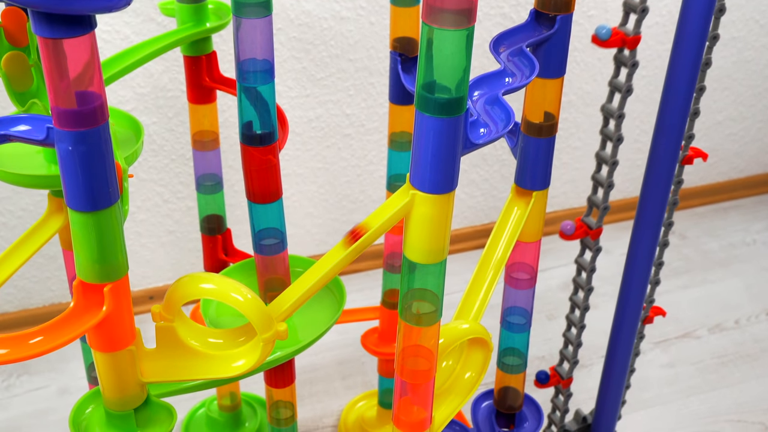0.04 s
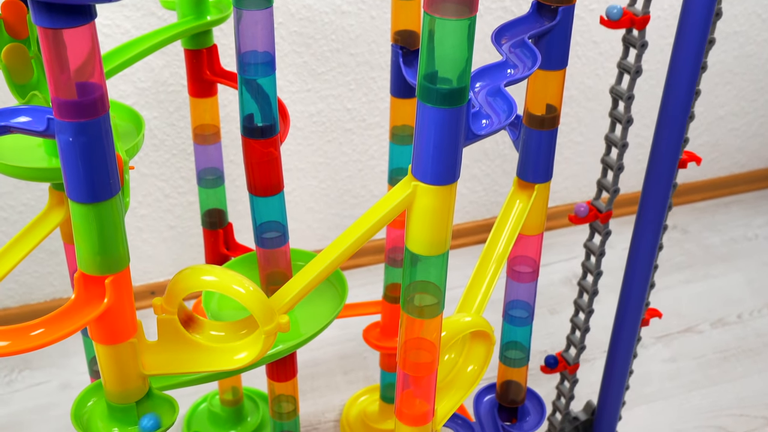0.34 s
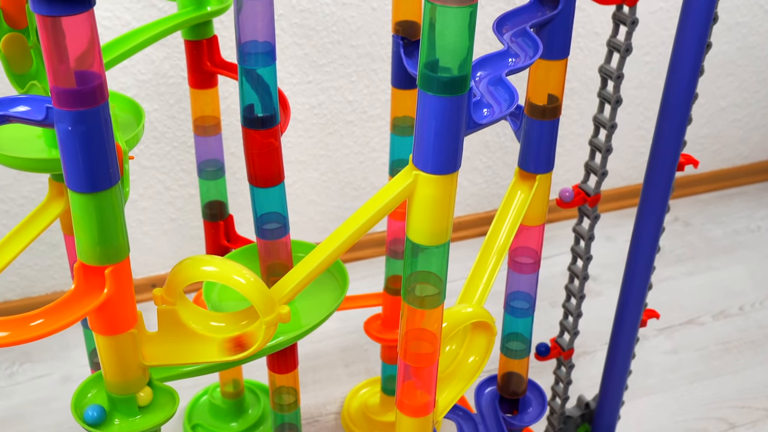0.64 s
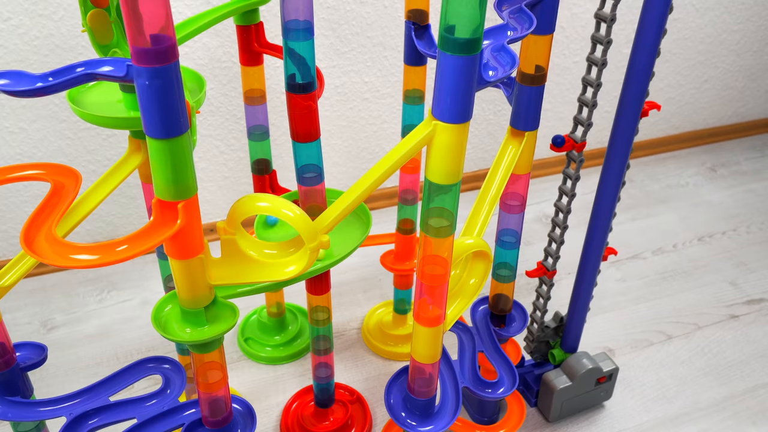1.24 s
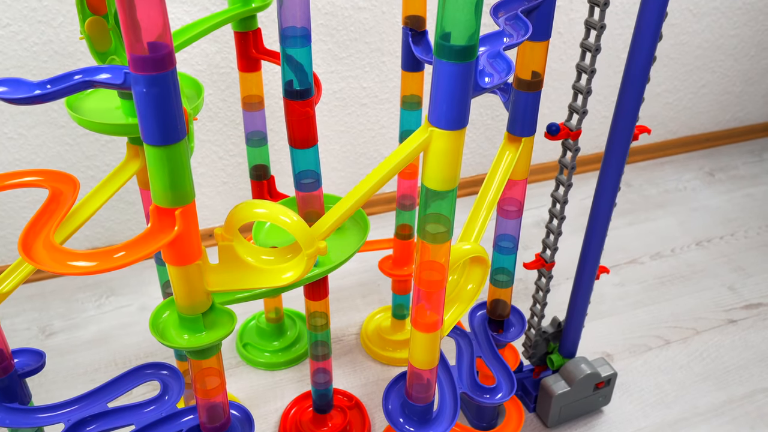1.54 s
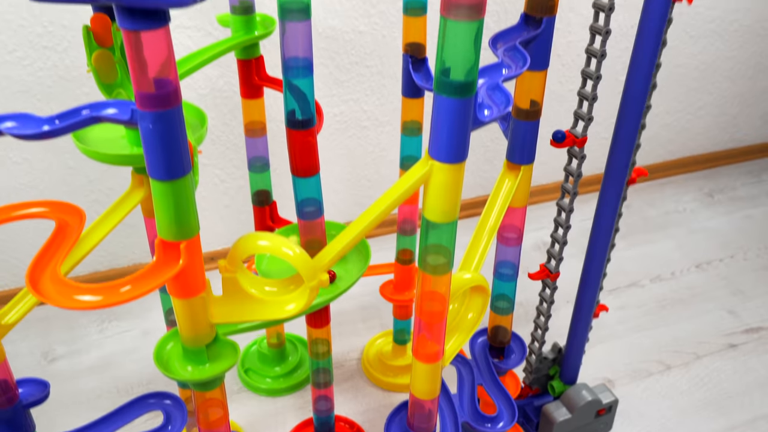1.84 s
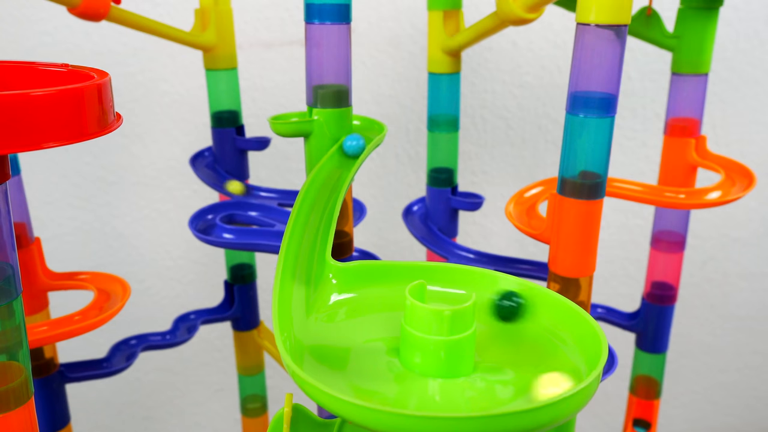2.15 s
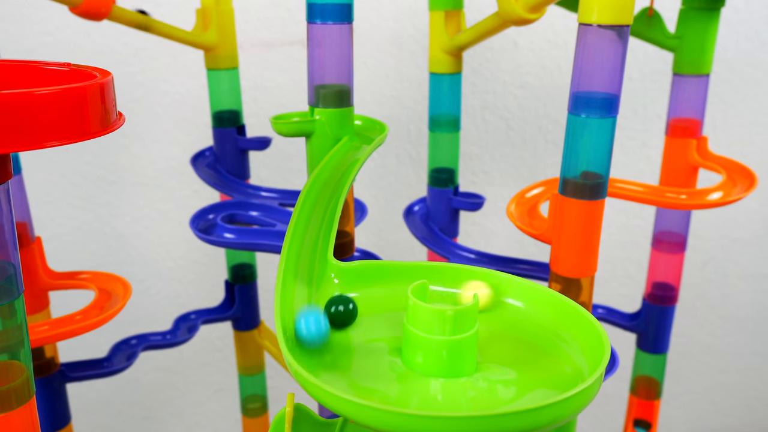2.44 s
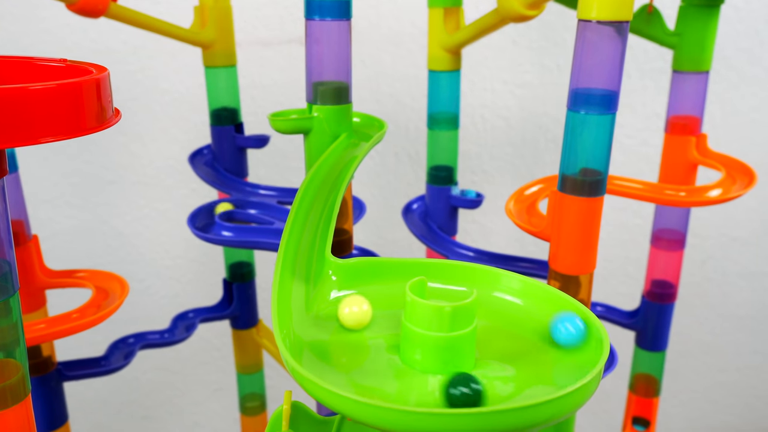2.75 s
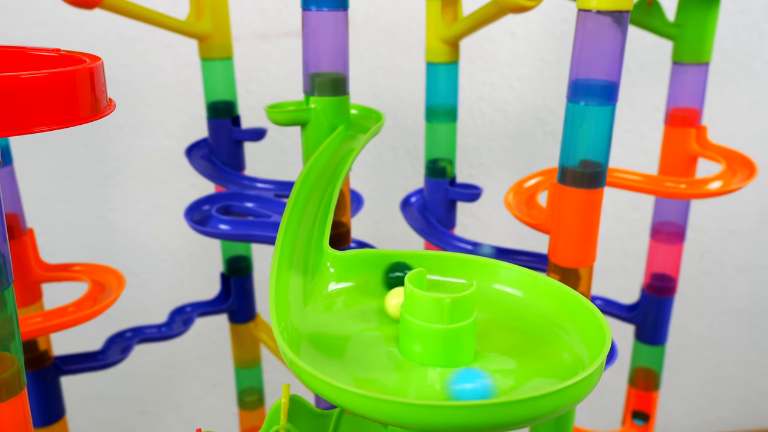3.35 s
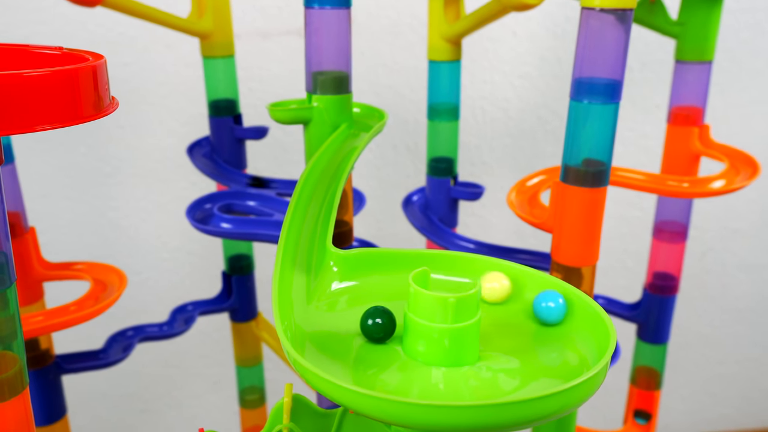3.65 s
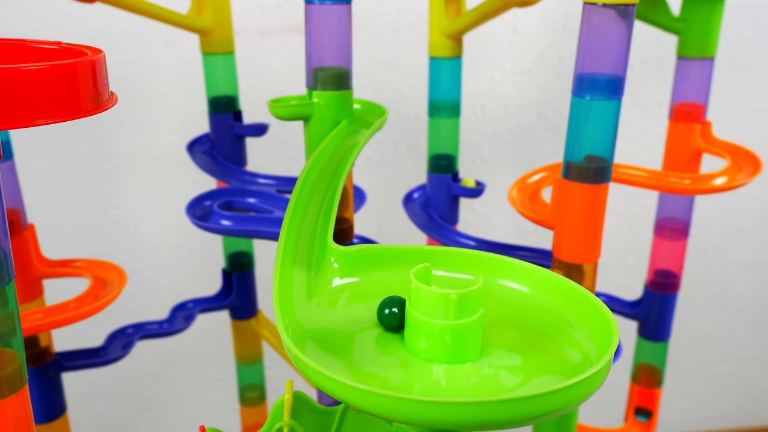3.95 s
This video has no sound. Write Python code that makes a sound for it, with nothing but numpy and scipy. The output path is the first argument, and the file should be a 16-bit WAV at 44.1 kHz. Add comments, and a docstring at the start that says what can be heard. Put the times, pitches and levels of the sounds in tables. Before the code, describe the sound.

Marbles roll and click through a plastic marble run: first a bright circling rattle, then quick ringing drops and a brief whirr, then clicks against a bowl and each other. A lift motor hums faintly, all close in a small room.

```python
"""Glass marbles run through a plastic marble run, close up in a small room.
From the start a lift motor hums faintly over rumble and hiss, while marbles circle a funnel with a
bright rattle and roll along tracks, tapping over tiny bumps. From 1.3 s the funnel falls back and
marbles drop in quick succession onto hollow pieces that ring; one whirrs round a loop, loudest near
2 s. After 2.2 s the drops, and the clicks on rims and other marbles, take on the tone of a wide bowl."""
import sys
import numpy as np
from scipy import signal
from scipy.fft import rfft, irfft
from scipy.io import wavfile

SR = 44100
rng = np.random.default_rng(int(sys.argv[2]) if len(sys.argv) > 2 else 0)


def output_pcm(signal):
    """Save a mono or channel-first signal as 16-bit PCM at the path in sys.argv[1].

    Samples are clipped to [-1, 1] before scaling.
    """
    pcm = np.clip(np.atleast_2d(signal).T, -1, 1) * 32767
    wavfile.write(sys.argv[1], SR, np.round(pcm).astype(np.int16))


N = 176400


def amp(db):
    """Decibels to gain."""
    return 10 ** (np.asarray(db) / 20)


def unit(x):
    """Scales to rms 1."""
    return x / np.sqrt(np.mean(x ** 2) + 1e-20)


def fader(points):
    """Gain over time from (t/s, level/dB) points, held beyond the first and last."""
    return amp(np.interp(np.arange(N) / SR, *np.transpose(points)))


def eq(x, points):
    """Filters by (f/Hz, level/dB) points."""
    hz, db = np.transpose(points)
    f = np.fft.rfftfreq(len(x), 1 / SR)
    return irfft(rfft(x) * amp(np.interp(np.log(f + 1), np.log(hz), db)), len(x))


def wander(rate_hz):
    """Slow random motion of rms 1."""
    f = np.fft.rfftfreq(N, 1 / SR)
    return unit(irfft(rfft(rng.standard_normal(N)) / (1 + (f / rate_hz) ** 4), N))


def add(mix, s, sound):
    """Mixes a sound in at time s."""
    part = mix[max(round(s * SR), 0):][:len(sound)]
    part += sound[:len(part)]


def resonance(f, hz, width):
    """Response of one damped mode, gain 1 at its centre."""
    return 1j * f * width / (hz ** 2 - f ** 2 + 1j * f * width)


def plastic(modes, size, low_cut_hz=359):
    """Response of a thin plastic piece: modes on a plain shell that radiates no bass."""
    f = np.fft.rfftfreq(size, 1 / SR)
    no_bass = signal.freqz(*signal.butter(4, low_cut_hz, "high", fs=SR), worN=f, fs=SR)[1]
    return no_bass * (1 + sum(amp(db) * resonance(f, hz, width) for hz, width, db in modes))


# Tone of the hiss and of the rumble: f/Hz, level/dB
HISS_EQ = [(80, -7), (120, 4.5), (220, -4), (340, -1), (800, 6.5), (2200, -1), (6000, -34), (7500, 1.5),
           (12500, -21), (16000, -55)]
RUMBLE_EQ = [(5, -4), (14, 6), (26, -15.5), (38, -1.5), (47, -2), (60, -20), (74, -18.5), (90, -27.5),
             (200, -60), (600, -90)]
# Fader ride on the rumble: t/s, level/dB
RUMBLE_SWELL = [(0, -3.5), (.8, -4.5), (1.4, -1.5), (2.15, 3.5), (2.32, 6.5), (2.45, 0.5), (3.2, -0.5),
                (4, -0.5)]

def room_tone(hiss_db=-50, rumble_db=-37):
    """The bed: soft hiss and a low swelling rumble."""
    hiss = unit(eq(rng.standard_normal(N), HISS_EQ))
    rumble = unit(eq(rng.standard_normal(N), RUMBLE_EQ))
    return amp(hiss_db) * hiss + amp(rumble_db) * fader(RUMBLE_SWELL) * rumble


# Partials of the motor hum: f/Hz, level/dB
MOTOR_TONES = [(339, -65.5), (1084, -71), (1438, -59), (1768, -77)]

def lift_motor(pitch_waver=0.0023, flutter_db=5.5):
    """The motor and its gears hum faint tones that waver together in pitch."""
    wavering_time = np.cumsum(1 + pitch_waver * wander(13.0)) / SR
    return sum(amp(db) * unit(np.sin(2 * np.pi * hz * wavering_time) * amp(flutter_db * wander(9.6)))
               for hz, db in MOTOR_TONES)


# Pitch and fader ride of the whirr: t/s, f/Hz, level/dB
WHIRR_PATH = [(1.35, 2110, -47), (1.721, 2017, -54), (1.96, 2093, -32.5), (2.22, 2207, -56),
              (2.4, 2097, -46), (2.55, 1960, -61)]

def loop_whirr(width_hz=160):
    """A marble running round the loop sings in one narrow, shifting resonance."""
    s, hz, db = np.transpose(WHIRR_PATH)
    carrier = np.exp(2j * np.pi * np.cumsum(np.interp(np.arange(N) / SR, s, hz)) / SR)
    narrow_noise = wander(width_hz) + 1j * wander(width_hz)
    return fader(np.transpose([s, db])) * unit((carrier * narrow_noise).real)


def rolling(ride, tone, modes, bumps_per_s=2500, spread_db=1, flutter_db=3):
    """A rolling marble taps over countless tiny bumps, which ring the piece under it."""
    sizes = amp(spread_db * np.minimum(rng.exponential(1, N), 3.5)) * rng.choice([-1, 1], N)
    bumps = sizes * (rng.random(N) < bumps_per_s / SR) * amp(flutter_db * wander(17.7))
    ringing = irfft(rfft(bumps) * plastic(modes, N), N)
    return fader(ride) * unit(eq(ringing, tone))


# Body resonances of the tracks: f/Hz, width/Hz, level/dB over the plain shell
TRACK_MODES = [(278, 21, 4.5), (335, 8.2, 7.5), (418.7, 16, 5), (480, 15, 5), (589, 18, -4), (692, 6.8, 3),
               (1098, 28, 3), (1463, 19, 6.5), (1796, 64, 5.5), (2855, 150, -1.5), (4600, 1700, -3),
               (8960, 2100, -4)]
# Fader ride on the track roll: t/s, level/dB
TRACK_RIDE = [(0, -37.5), (.7, -45), (.9, -40.5), (1.3, -44.5), (1.5, -37.5), (1.72, -47), (1.84, -46),
              (1.96, -33.5), (2.1, -46), (2.22, -60), (2.37, -46.5), (2.62, -48), (2.8, -49.5),
              (3.16, -40.5), (3.36, -57), (3.6, -37), (3.76, -49.5), (4, -38.5)]
# Tone of the track roll: f/Hz, level/dB
TRACK_EQ = [(300, -7), (500, -5.5), (1000, -0.5), (1900, -7), (3000, -1), (5000, -9.5), (8000, -17),
            (16000, -25)]

def track_roll():
    """Marbles run along the tracks with a dark, grainy roll."""
    return rolling(TRACK_RIDE, TRACK_EQ, TRACK_MODES)


# Body resonances of the funnel: f/Hz, width/Hz, level/dB over the plain shell
FUNNEL_MODES = [(591, 18, 11), (1033, 24, 9), (1696, 167, 12.5), (2365, 130, 10), (2615, 90, 12.5),
                (2990, 46, 11.5), (6560, 460, 2.5), (7575, 370, 7.5), (9320, 174, 11.5), (10250, 270, 7.5),
                (11210, 190, 6), (12900, 390, 5)]
# Fader ride on the circling marbles: t/s, level/dB
FUNNEL_RIDE = [(0, -26), (.08, -30), (.15, -38.5), (.22, -37.5), (.26, -36), (.33, -52), (.39, -38.5),
               (.44, -37), (.51, -44.5), (.58, -37), (.66, -43), (.77, -40), (.85, -46.5), (.96, -31),
               (1.06, -33.5), (1.14, -37.5), (1.22, -49.5), (1.35, -51)]
# Tone of the funnel roll and of its rattle: f/Hz, level/dB
FUNNEL_EQ = [(300, -21), (550, -4), (1700, -2), (3000, -1.5), (4500, 2), (9000, -9), (11500, -14),
             (16000, -26)]
RATTLE_EQ = [(300, -13), (1700, -5), (4500, -8), (7500, 3), (11500, -2.5), (16000, -20)]

def funnel_roll(rattle_db=-10.5):
    """Marbles circle the funnel: a dense roll with a bright rattle of sparser taps on top."""
    roll = rolling(FUNNEL_RIDE, FUNNEL_EQ, FUNNEL_MODES)
    rattle = rolling(FUNNEL_RIDE, RATTLE_EQ, FUNNEL_MODES, bumps_per_s=92, spread_db=2.5)
    return roll + amp(rattle_db) * rattle


SNAP_DB, SNAP_TOP_HZ = 13.5, 6300  # the clean first impulse of glass on plastic
CRACK_TOP_HZ, STRIKE_S = 11800, .006  # a crack's level is set over its first STRIKE_S
SPOT_MODE_DB, SPOT_MODE_WIDTH_HZ = 2.5, 170
RING_WIDTH_HZ, RING_T60_S, RING_RISE_S = 240, 0.29, 0.00054
ROOM_TOP_HZ, ROOM_RISE_S, CLICK_ROOM_DB = 11000, 0.0036, -2
BANDS_HZ = [700, 2000, 4500, 10000]  # bass, mid, presence, treble
PIECE_CHANGES_S = [1.3, 2.23]  # hits move from funnel to track, then to bowl
# Body resonances of the wide bowl: f/Hz, width/Hz, level/dB over the plain shell
BOWL_MODES = [(588, 12.4, 2), (1120, 35, 3.5), (1507, 127, 2), (1790, 31, -4), (3030, 110, -4),
              (3690, 78, 2), (4500, 480, -10), (5060, 130, -7), (6700, 130, -7), (7670, 580, -10),
              (11430, 830, -7)]
# Hit envelope, a row per band: crack t60/s, shell level/dB, shell t60/s, room level/dB, room t60/s
HIT_DECAY = [(0.039, -8, 0.079, -14, 0.53), (0.005, -5, 0.035, -16.5, 0.49),
             (0.0059, -14, 0.047, -15.5, 0.37), (0.0042, -15.5, 0.038, -14.5, 0.29)]
# Clicks on rims and other marbles: t/s, level/dB in each of the four bands
CLICKS = [(0.004, -55.5, -35, -46, -26.5), (0.058, -36, -38, -54, -37), (0.191, -45, -39, -28.5, -41),
          (0.597, -48, -33, -62, -36), (0.63, -48, -35, -54, -41), (0.6893, -45, -28.5, -41, -36),
          (0.855, -56, -36, -50, -58), (1.031, -50, -31, -37, -30.5), (1.1349, -63.5, -45, -38, -40),
          (1.1551, -47, -43, -40, -35.5), (1.2219, -39, -41, -50, -43), (1.5266, -50, -28.5, -34, -38),
          (1.608, -42.5, -33.5, -40, -45), (1.8186, -41, -22, -33, -38), (1.836, -52, -29.5, -33, -36),
          (1.891, -57, -42, -18, -27.5), (1.9424, -45, -38, -22, -32), (1.953, -46, -38, -23, -31),
          (1.97, -34, -28, -25.5, -43), (2.079, -33.5, -26, -27, -39), (2.1212, -41, -31.5, -37.5, -38),
          (2.2612, -71, -65, -47.5, -37.5), (2.3043, -52, -40, -45, -49), (2.398, -60, -54, -50, -39),
          (2.4291, -44, -45, -38, -63), (2.5541, -46.5, -39, -35.5, -37), (2.656, -41.5, -45, -38, -46),
          (2.736, -51, -42.5, -38, -47), (2.9228, -47, -25.5, -28.5, -21), (2.935, -38, -29.5, -26, -42),
          (2.9646, -59, -34, -37, -48), (3.0249, -44, -33.5, -24.5, -30.5), (3.074, -46, -36, -35.5, -34),
          (3.0985, -45, -37, -34.5, -35), (3.128, -40.5, -48, -55, -36), (3.152, -44, -34, -40, -46),
          (3.195, -54, -40, -38.5, -59), (3.262, -46, -37.5, -38, -45), (3.2917, -44, -38, -53, -42),
          (3.414, -48, -30.5, -27, -35), (3.606, -57, -47, -32, -45), (3.626, -56, -31, -38, -40),
          (3.6448, -39, -28.5, -27.5, -36), (3.673, -46, -31, -31, -40), (3.7855, -53, -55, -45, -38),
          (3.858, -54, -33.5, -39, -44), (3.8743, -42, -32, -26.5, -35),
          (3.905, -44.5, -33.5, -35.5, -39.5), (3.941, -53, -43, -42, -47)]
# Drops onto hollow pieces: t/s, level/dB in each of the four bands, ring f/Hz, ring gain/dB, room send/dB
DROPS = [(0.195, -34.5, -27.5, -36, -18, 8840, -38, -17), (0.37, -35, -28, -33, -25.5, 6820, -49, -14),
         (0.5434, -36.5, -30, -39, -33, 1610, -33, 3), (0.896, -68, -23.5, -22, -24.5, 3560, -16.5, 1.5),
         (1.012, -38.5, -30.5, -34, -25.5, 7630, -41, 3.5),
         (1.358, -33.5, -23.5, -22.5, -23.5, 2052, -14, -0.5),
         (1.4462, -30, -27, -19, -26.5, 1930, -18.5, -1.5), (1.474, -35, -23, -27, -28, 2060, -24.5, -7),
         (1.5708, -36.5, -22, -32, -37, 2830, -30.5, 0.5),
         (1.7735, -32.5, -22.5, -21.5, -27.5, 1946, -20, 2.5),
         (1.8883, -35, -24.5, -33, -32.5, 1940, -19, 6.5), (1.939, -36, -25, -30, -24.5, 1988, -14.5, -2),
         (2.009, -38.5, -22, -29, -30, 2076, -33, -2.5), (2.064, -36.5, -21, -28.5, -31, 2184, -34, 2),
         (2.349, -63, -37.5, -41, -56, 3330, -37, -9), (2.525, -47, -55, -30.5, -42, 4690, -41, -12),
         (2.8209, -41.5, -24, -18, -28, 3780, -27, -3.5), (2.915, -32, -26.5, -19.5, -26, 2700, -52, -21),
         (3.2468, -59, -26, -40, -33, 3390, -32, -4), (3.312, -51, -36, -52, -42, 1520, -34, -12),
         (3.376, -58, -39.5, -41, -56, 1555, -47, -14), (3.4031, -41.5, -34, -26.5, -25, 4840, -23, -6),
         (3.458, -37, -22, -19.5, -20.5, 5300, -19, 0.5), (3.547, -45, -25.5, -29, -32, 3960, -36, 1),
         (3.5598, -39, -20.5, -17, -36, 4230, -38, 3), (3.568, -59, -45, -21.5, -39.5, 3280, -23, 8.5),
         (3.7966, -42, -28, -24.5, -25.5, 4750, -23, -13), (3.8126, -35.5, -25, -29.5, -35, 1530, -35, 5.5),
         (3.9816, -39, -19.5, -24, -36, 4740, -19.5, 3.5)]

def marble_hits(size=16384):
    """Each hit is a crack, a shiver of the shell and a room tail; a drop also rings a hollow piece."""
    t, f = np.arange(size) / SR, np.fft.rfftfreq(size, 1 / SR)
    bands = np.array([np.interp(np.log(f + 1), np.log(BANDS_HZ), w) for w in np.eye(len(BANDS_HZ))])
    pieces = [bands * plastic(modes, size) for modes in (FUNNEL_MODES, TRACK_MODES, BOWL_MODES)]
    crack_top, room_top = (1 / np.sqrt(1 + (f / hz) ** 10) for hz in (CRACK_TOP_HZ, ROOM_TOP_HZ))
    snap = amp(SNAP_DB) / (1 + 1j * f / SNAP_TOP_HZ) ** 2
    crack_t60, shell_db, shell_t60, tail_db, tail_t60 = np.transpose(HIT_DECAY)[:, :, None]
    direct_shape = np.hypot(amp(-60 * t / crack_t60), amp(shell_db - 60 * t / shell_t60))
    room_shape = amp(tail_db - 60 * t / tail_t60) * (1 - np.exp(-t / ROOM_RISE_S))
    ring_shape = amp(-60 * t / RING_T60_S) * (1 - np.exp(-t / RING_RISE_S))
    fade_out = np.clip(10 * (1 - t / t[-1]) - 1, 0, 1)

    def strike(s, band_db, room_db, count=5):
        """One contact, with its own strength in each band; the struck spot favours a few modes."""
        spot = sum(resonance(f, hz, SPOT_MODE_WIDTH_HZ) for hz in rng.uniform(1200, 12190, count))
        body = pieces[np.searchsorted(PIECE_CHANGES_S, s)] * (1 + amp(SPOT_MODE_DB) * spot)
        scatter, room_noise = rng.standard_normal((2, size))
        crack = irfft((rfft(scatter * direct_shape) + snap) * body * crack_top) * fade_out
        crack /= np.sqrt(np.mean(crack[:, :round(STRIKE_S * SR)] ** 2, axis=1, keepdims=True))
        tail = irfft(rfft(room_noise) * body * room_top)
        tail *= 2 * room_shape * amp(room_db) / tail.std(axis=1, keepdims=True)
        return amp(band_db) @ (crack + tail)

    def ring(hz, count=40):
        """A cluster of close modes of a hollow piece, beating as they die; higher clusters are wider."""
        modes_hz = hz + RING_WIDTH_HZ * np.sqrt(hz / 2500) * rng.standard_normal((count, 1))
        partials = np.sin(2 * np.pi * (modes_hz * t + rng.random((count, 1))))
        cluster = ring_shape * unit(partials.sum(0))
        return signal.lfilter(*signal.butter(2, hz / 2, "high", fs=SR), cluster) / 2

    hits = np.zeros(N)
    for s, *band_db, ring_hz, ring_db, room_db in DROPS:
        add(hits, s, strike(s, band_db, room_db) + amp(ring_db) * ring(ring_hz))
    for s, *band_db in CLICKS:
        add(hits, s, strike(s, band_db, CLICK_ROOM_DB))
    return hits


def scene():
    """Mono mix of rolls, hits and whirr over the motor and room tone."""
    return (funnel_roll() + track_roll() + marble_hits() + loop_whirr() + lift_motor() + room_tone())[None]


def record(dry):
    """A soft clip rounds off the sharpest peaks; a steep low-pass trims the very top."""
    ceiling, top_hz = .56, 15900
    rounded = dry / (1 + (dry / ceiling) ** 4) ** (1 / 4)
    low_pass = signal.firwin(255, top_hz, window=("kaiser", 8), fs=SR)
    return signal.oaconvolve(rounded, low_pass[None], "same")


dry = scene()
out = record(dry)
output_pcm(out)
```